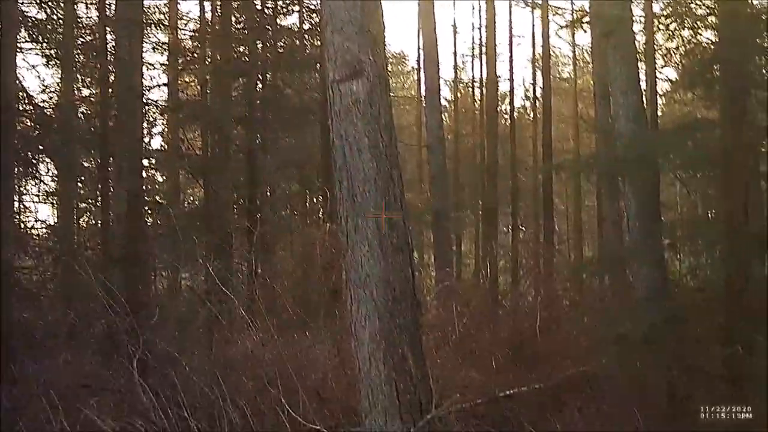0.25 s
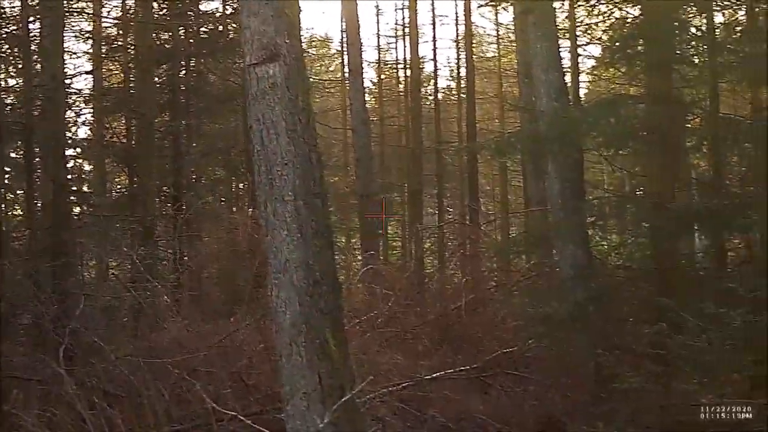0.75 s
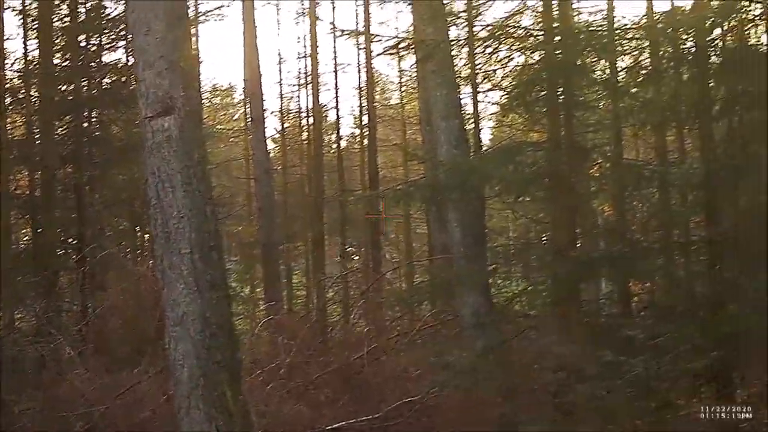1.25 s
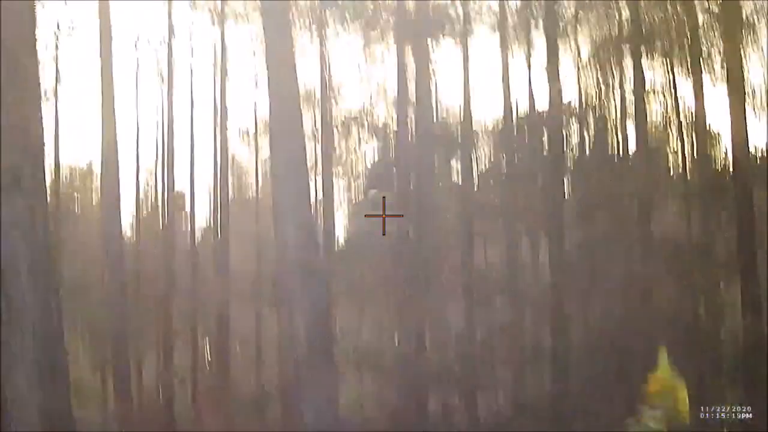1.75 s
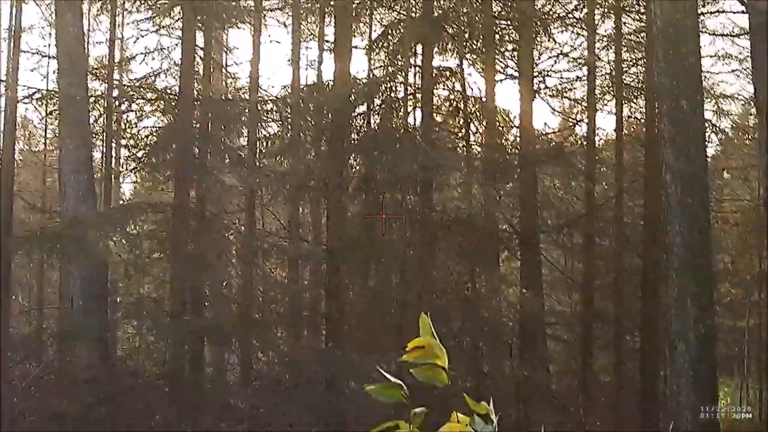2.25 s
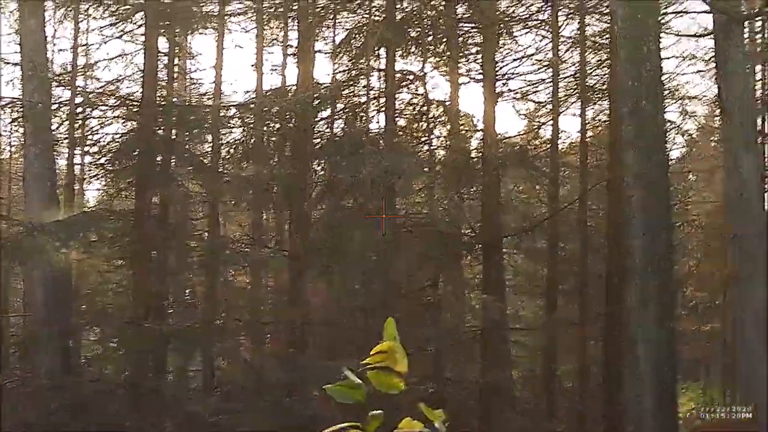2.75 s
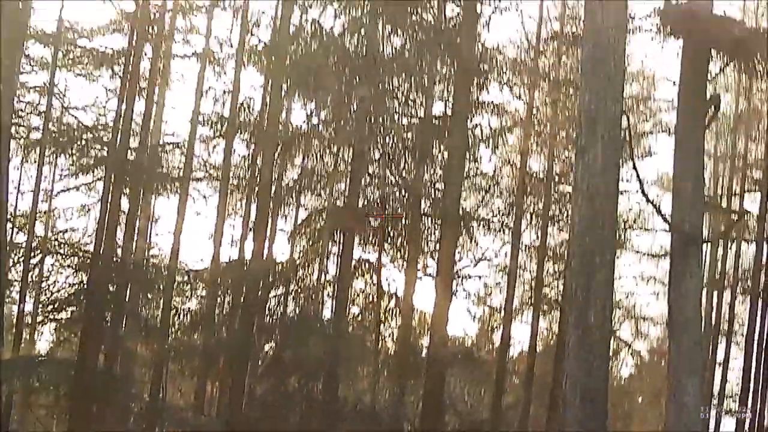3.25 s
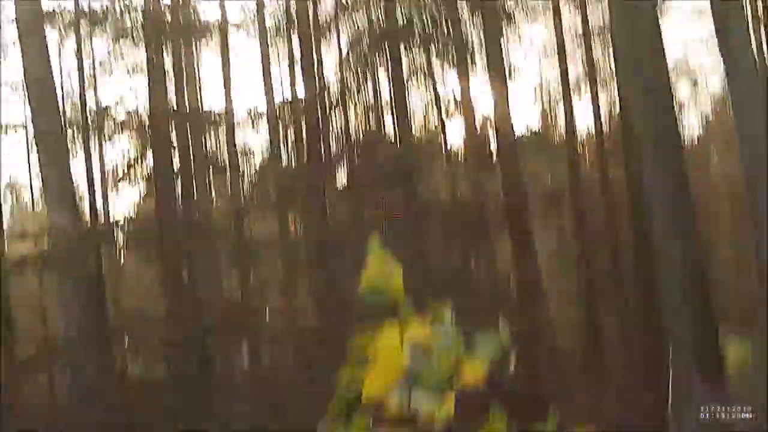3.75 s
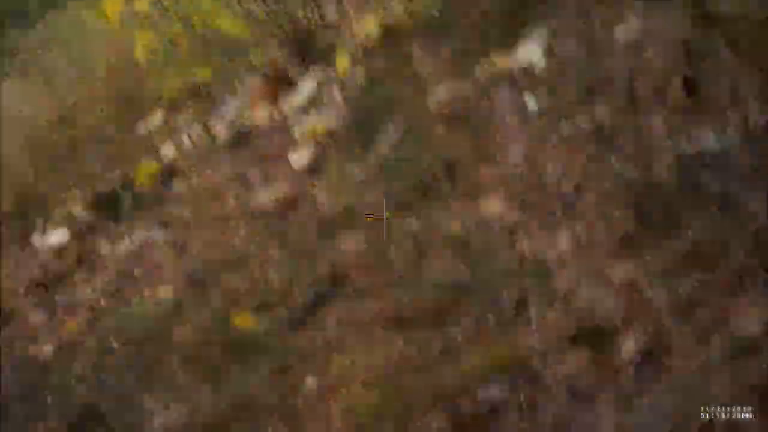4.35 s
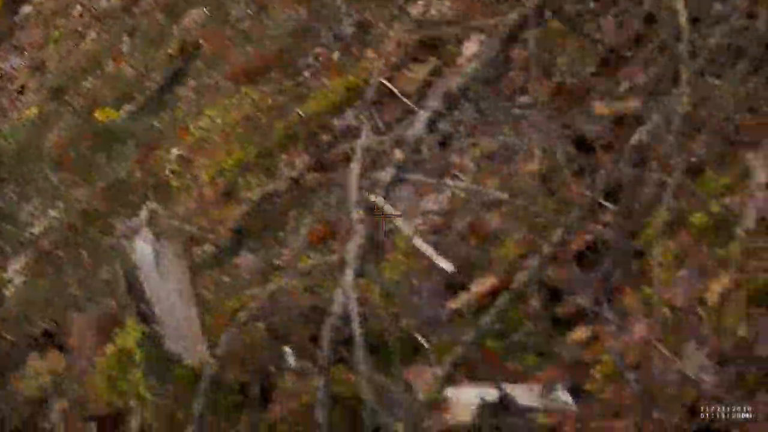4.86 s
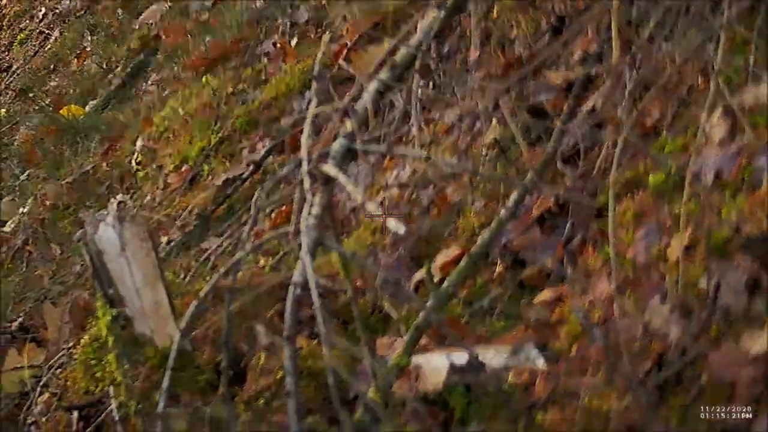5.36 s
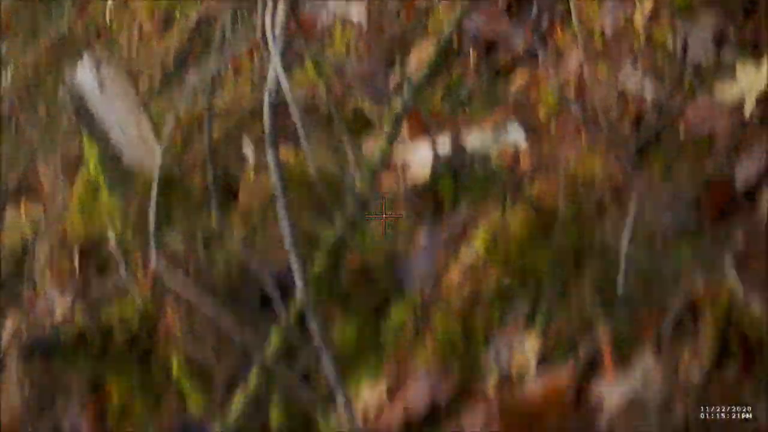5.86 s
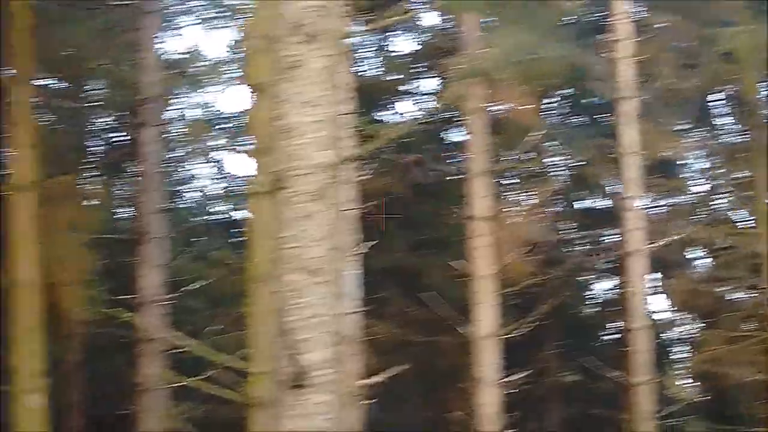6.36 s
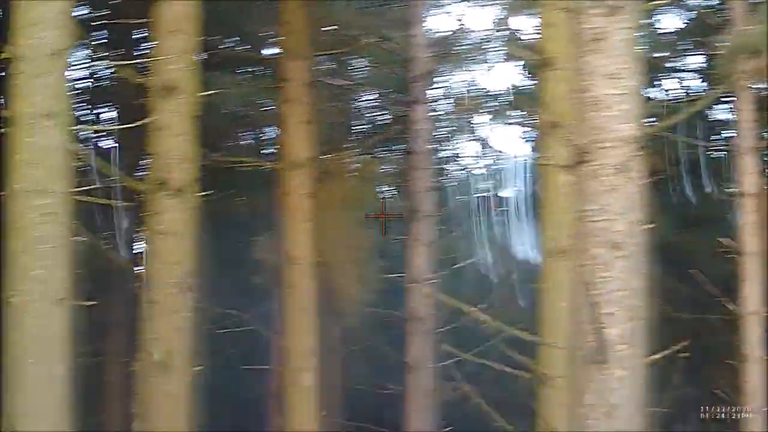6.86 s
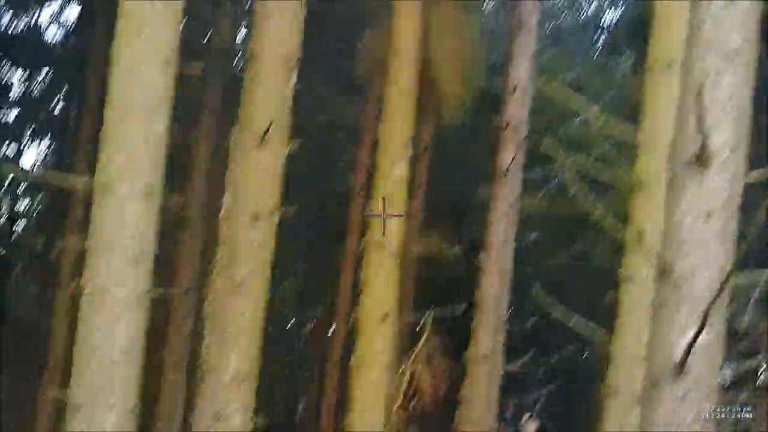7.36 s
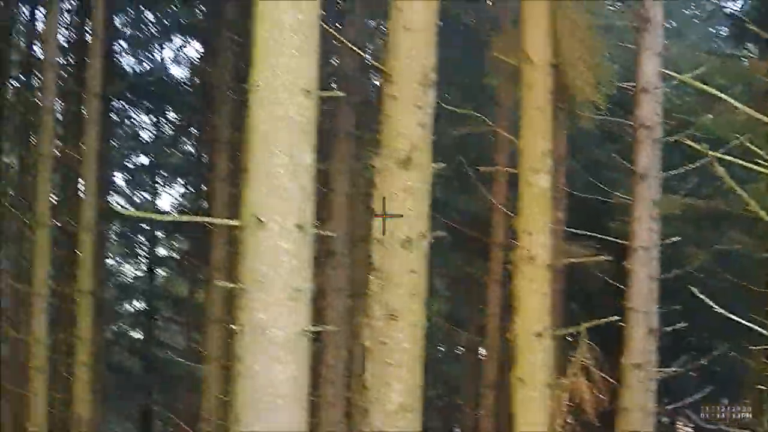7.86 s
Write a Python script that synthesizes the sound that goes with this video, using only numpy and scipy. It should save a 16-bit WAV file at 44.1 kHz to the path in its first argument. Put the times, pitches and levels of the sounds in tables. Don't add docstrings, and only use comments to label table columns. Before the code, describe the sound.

A muffled, close microphone on the gun catches a fading forest echo, then a huge clipped shotgun shot that chokes into near silence before trunk echoes burst out hollowly. Hands rumble and scrape on the stock, small dry taps lead to a loud metallic closing clack, sound cuts out for an instant, and a second, roaring shot follows with clattering fittings and reverberation.

```python
import sys
import numpy as np
from scipy import signal
from scipy.io import wavfile
from scipy.ndimage import uniform_filter1d

SR = 44100
rng = np.random.default_rng(int(sys.argv[2]) if len(sys.argv) > 2 else 0)


def master_out(mix):
    frames = np.transpose(np.atleast_2d(mix))
    ceiling = np.clip(frames, -1, 1)
    pcm = np.round(ceiling * 32767).astype(np.int16)
    wavfile.write(sys.argv[1], SR, pcm)


def to_linear_factor(level_db):
    exponent = np.asarray(level_db, float) / 20
    return 10 ** exponent


N = 357651
GAP_START_S, GAP_END_S = 6.2265, 6.4512
LIMIT = .52


def band(x, low_hz, high_hz, order=2):
    edges = [low_hz, min(high_hz, 9000)]
    return signal.sosfilt(signal.butter(order, edges, "band", fs=SR, output="sos"), x)


def rms_one(x):
    return x / np.sqrt(np.mean(x ** 2) + 1e-20)


def ring(x, hz, t60):
    r = to_linear_factor(-60 / (t60 * SR))
    w = 2 * np.pi * hz / SR
    return signal.lfilter([0, np.sin(w)], [1, -2 * r * np.cos(w), r * r], x)


def add(out, s, x):
    i = round(s * SR)
    out[i:i + len(x)] += x[:N - i]


def flicker(hz):
    slow = signal.butter(2, hz, fs=SR, output="sos")
    noise = rng.standard_normal(N + SR)
    return rms_one(signal.sosfilt(slow, noise)[SR:])


# start in seconds,
# peak level in dB, pitch in Hz, time to fall 60 dB in seconds.
SOFT_BUMPS = [(0.004, -22.5, 191, 0.076), (0.07, -30.5, 192, 0.1), (0.125, -39, 188, 0.1),
              (2.14, -20.5, 194.5, 0.16), (2.152, -25, 197, 0.064), (2.193, -36, 204, 0.054),
              (2.245, -28.5, 193, 0.11), (2.329, -25.5, 195, 0.1), (4.584, -51, 76, 0.052),
              (4.945, -43, 103, 0.058), (5.074, -48, 90, 0.061), (5.31, -28.5, 190, 0.17),
              (5.387, -29, 145.3, 0.086), (5.425, -46.5, 155, 0.15), (5.567, -19.5, 147, 0.051),
              (5.647, -39.5, 148, 0.072), (6.165, -45.5, 81, 0.12), (6.208, -32, 155, 0.035),
              (6.217, -32.5, 71.5, 0.08), (6.587, -45, 191, 0.15), (7.376, -26, 175, 0.15),
              (7.387, -37, 202, 0.081), (7.468, -20.5, 181, 0.084)]


def bumps():
    out = np.zeros(N)
    push = np.r_[np.hanning(90) / 45, np.zeros(9000)]
    for s, db, hz, t60 in SOFT_BUMPS:
        thump = ring(push, hz, t60)
        add(out, s, to_linear_factor(db + 3) * band(thump, .4 * hz, 1.6 * hz))
    return out


# pitch in Hz, width in Hz, level in dB.
HOUSING_RINGS = [
    (194.1, 19, -6),
    (618, 49, 7),
    (1024, 120, -4),
]
# time of the shot in seconds, strength in dB.
ECHO_TAILS = [
    (-.25, 1),
    (1.946, 1.5),
    (7.137, 5.5),
]
# near trunks in dB, their time to fall 60 dB in seconds,
# far trunks in dB, their time to fall 60 dB in seconds, still air in dB.
WOOD_LAYERS = [
    (-23.5, 1, -29.5, 3.01, -59.5),
    (-36, 2.59, -45.5, 4.4, -69),
    (-39.5, 0.89, -52, 0.91, -86),
    (-47.5, 0.71, -54.5, 0.95, -95),
]


def air():
    t = np.arange(N) / SR
    echoes = rng.standard_normal((3, N)) * to_linear_factor(0.61 * flicker(16))
    rings = []
    for k, (hz, width, db) in enumerate(HOUSING_RINGS):
        rings.append(to_linear_factor(db) * rms_one(ring(echoes[k % 2], hz, 2.2 / width)))
    low = rings[0] + 0.15 * rms_one(band(echoes[2], 170, 330))
    upper = rings[1] + rings[2] + .5 * rms_one(band(echoes[2], 310, 1300, order=3))
    mid = band(echoes[1], 1150, 2300, order=5)
    bright = band(echoes[2], 2300, 4100, order=5) + .3 * band(echoes[0], 4100, 6500)
    out = 0
    for colour, row in zip([low, upper, mid, bright], WOOD_LAYERS):
        near_db, near_t60, far_db, far_t60, still_db = row
        power = to_linear_factor(2 * still_db)
        for s, db in ECHO_TAILS:
            age = np.maximum(t - s, 0)
            near = to_linear_factor(2 * (near_db - 60 * age / near_t60))
            far = to_linear_factor(2 * (far_db - 60 * age / far_t60))
            end = GAP_START_S if s < GAP_START_S else np.inf
            power = power + (t > s + .07) * (t < end) * to_linear_factor(2 * db) * (near + far)
        lumps = to_linear_factor(1.2 * flicker(14))
        out = out + np.sqrt(power) * rms_one(colour * lumps)
    return out


# time in seconds, level in dB.
HAND_EFFORT = [(0.4, -64), (1.2, -101), (1.75, -67), (2.8, -67.5), (3.4, -65.5), (3.8, -53.5), (4.3, -62),
               (4.6, -51), (4.78, -69), (5.08, -48.5), (5.24, -64), (5.4, -42.5), (5.7, -50), (5.8, -63),
               (6.15, -55), (6.6, -65), (7.0, -62), (8.11, -43.5)]


def effort():
    t = np.arange(N) / SR
    sway_db, sway_t60_s = -44, 0.53
    power = to_linear_factor(2 * np.interp(t, *np.transpose(HAND_EFFORT)))
    for s, db in ECHO_TAILS:
        age = np.maximum(t - s, 0)
        power = power + (t > s) * to_linear_factor(2 * (sway_db + db - 60 * age / sway_t60_s))
    return 10 * np.log10(power)


def hands():
    rumble_db = effort()
    scuff_db = -52 + 0.4 * rumble_db
    rumble = band(rng.standard_normal(N), 30, 130) * to_linear_factor(4 * flicker(10))
    slips_per_s = 250 * to_linear_factor(6 * flicker(15))
    slips = (rng.random(N) < slips_per_s / SR) * rng.standard_normal(N)
    scuff = ring(slips, 600, 0.18) + ring(slips, 960, 0.015)
    scuff += 4 * band(slips, 450, 1800) + 0.39 * band(slips, 1400, 4200)
    return to_linear_factor(rumble_db - 3.5) * rms_one(rumble) + to_linear_factor(scuff_db) * rms_one(scuff)


# start in seconds, peak level in dB.
TRUNK_ECHOES = [
    (0.092, -32.5),
    (2.133, -22),
    (2.19, -25.5),
    (2.228, -28),
    (2.281, -29.5),
    (7.38, -48),
]
# start
# in seconds, peak level in dB, body pitch in Hz, steel level in dB.
LOOSE_RATTLES = [(0.247, -41.5, 970, -48), (0.348, -43, 680, -79), (0.368, -32, 825, -56.5),
                 (2.566, -37, 1070, -45.5), (2.638, -38, 745, -75), (2.669, -35, 605, -55),
                 (6.45, -77, 378, -56), (7.524, -30, 576, -44.5), (7.575, -29.5, 506, -41),
                 (7.613, -24.5, 600, -41), (7.639, -28, 606, -40), (7.673, -27, 933, -52.5),
                 (7.696, -30, 605, -57), (7.731, -55, 634, -57), (7.772, -51, 620, -60),
                 (8.015, -41, 590, -65.5)]
# start in seconds, peak level in dB, body pitch in Hz, steel level in dB.
GRIP_SHIFTS = [(1.029, -64, 696, -75), (2.987, -47, 604, -89), (3.342, -44, 595, -67),
               (3.402, -47.5, 650, -61), (3.433, -52, 980, -65.5), (3.816, -45, 596, -70),
               (3.86, -58.5, 910, -71), (4.076, -46, 666, -66.5), (4.098, -54, 1000, -68),
               (4.159, -44.5, 1020, -67), (4.192, -48, 730, -54), (4.205, -38.5, 636, -59),
               (4.212, -47, 990, -62), (4.263, -38, 533, -61), (4.279, -44, 673, -60),
               (4.321, -43, 620, -70), (4.464, -50.5, 603, -66), (4.521, -45, 933, -78),
               (4.529, -44, 392, -80)]
# start in seconds, peak level in dB, body pitch in Hz.
RELOAD_TAPS = [(4.723, -50.5, 880), (5.02, -42.5, 1010), (5.061, -49, 600), (5.168, -56, 964),
               (5.302, -29.5, 625), (5.444, -55, 1080), (5.643, -40.5, 470), (5.675, -55, 760),
               (5.727, -55.5, 1056), (5.923, -54.5, 1070), (6.177, -50.5, 640), (6.2, -37, 680)]
# time for the body to fall 60 dB in seconds, scrape length in seconds.
KNOCK_KINDS = [
    (0.11, 0.0034),
    (0.018, 0.0045),
    (0.045, 0.0058),
    (0.021, 0.0054),
]


def knock_rows():
    echo, rattle, grip, tap = KNOCK_KINDS
    rows = [(s, db, 587, -58.5, *echo) for s, db in TRUNK_ECHOES]
    rows += [(*row, *rattle) for row in LOOSE_RATTLES]
    rows += [(*row, *grip) for row in GRIP_SHIFTS]
    rows += [(s, db, hz, -44 + .45 * db, *tap) for s, db, hz in RELOAD_TAPS]
    return rows


# pitch in Hz, level in dB, time to fall 60 dB in seconds.
STEEL_MODES = [(1600, -5, .012), (2220, -2, .018), (3150, 0, .026), (3360, -5, .018), (4050, -2, .018),
               (5000, -4, .012), (6360, -9, .015), (7200, -10, .012)]


def knocks():
    out, t = np.zeros(N), np.arange(6000) / SR
    for s, db, hz, steel_db, t60, length in knock_rows():
        age = t / length
        scrape = rng.standard_normal(len(t)) * np.sqrt(age) * np.exp(-age)
        body = ring(scrape, hz, t60)
        rustle = band(scrape, 483, 1010, order=3)
        body = band(body / abs(body).max() + 0.51 * rustle / abs(rustle).max(), 250, 1600)
        steel = 0
        for mode_hz, mode_db, mode_t60 in STEEL_MODES:
            strength = to_linear_factor(mode_db + 5 * rng.standard_normal())
            steel = steel + strength * ring(scrape, mode_hz, mode_t60)
        snap = band(scrape, 1400, 5000, order=3)
        steel = .85 * steel / abs(steel).max() + 0.33 * snap / abs(snap).max()
        add(out, s, to_linear_factor(db + 1.5) * body + to_linear_factor(steel_db + 3.0) * steel)
    return out


# time of the blast front in seconds, seconds the lock-work knock runs ahead through
# the steel, barrel ring in Hz, seconds until that ring starts, gas roar in diaphragm limits.
GUN_SHOTS = [
    (1.9462, .0068, 146, .0034, 3.5),
    (7.1410, .0068, 142, .0031, 6.5),
]


def blasts():
    out, t = np.zeros(N), np.arange(4000) / SR
    strike = (t == 0) * 1.0
    for s, ahead, hz, delay, roar in GUN_SHOTS:
        knock = .4 * ring(strike, 105, .04) + .17 * ring(strike, 600, .08)
        growth = np.clip(t / ahead, 0, 1) ** 3
        rattle = band(rng.standard_normal(len(t)), 900, 3500) * 0.25 * growth
        add(out, s - ahead, (knock + rattle) * (t < ahead))
        add(out, s, -4 * (t < .00075))
        add(out, s + delay, 26 * np.sin(2 * np.pi * hz * t) * np.exp(-t / .0077))
        gas = band(rng.standard_normal(len(t)), 700, 4500)
        add(out, s, gas * 1.6 * roar * np.exp(-t / .009))
    return out


# seconds after the blast front, deflection in limits.
GAS_PUSH = [
    (.0008, 0),
    (.001, 7),
    (.006, 3),
    (.0165, 3),
    (.0195, 6),
]
# seconds the slam takes to free the diaphragm, dip in limits,
# rebound in limits, time it leaves the lower limit in seconds, settling time in seconds.
SHOT_RECOILS = [
    (.0045, -.45, 1.5, 2.122, .034),
    (.0015, -.05, .3, 7.361, .088),
]


def swing():
    t = np.arange(N) / SR
    out = -.25 * np.exp(-t / .07)
    resumed = (t > GAP_END_S) * (t < GUN_SHOTS[-1][0])
    out += resumed * (.028 + .075 * (t - GAP_END_S))
    deepest, free_at = -3, -1.06
    for shot, slam_row, recoil in zip(GUN_SHOTS, ACTION_SLAMS, SHOT_RECOILS):
        front, slam, length = shot[0], slam_row[0], slam_row[1]
        fall, dip, rebound, free, settle = recoil
        back, end = slam + .46 * length, slam + length + .001
        path = [(front + s, d) for s, d in GAS_PUSH]
        path += [(slam - .0005, 1.4), (slam + fall, dip), (back, dip)]
        path += [(back + .0005, rebound), (slam + .79 * length, rebound)]
        path += [(end, deepest / 2), (end + .026, deepest), (free, free_at)]
        settling = (1 + np.maximum(t - free, 0) / settle) ** -1.2
        out += np.interp(t, *np.transpose(path)) * settling
    return out


# start in seconds, length in seconds, level in dB, ring in Hz.
ACTION_SLAMS = [
    (1.9905, .0145, -10.5, 950),
    (7.1995, .012, -12.5, 1370),
]


def slams():
    out, t = np.zeros(N), np.arange(3000) / SR
    for s, length, db, hz in ACTION_SLAMS:
        clatter = rng.standard_normal(len(t)) * np.exp(-(t / length) ** 4)
        tone = ring(clatter, hz, 0.038)
        sound = .8 * tone / abs(tone).max()
        sound += 2.3 * band(clatter, 250, 1500) + .45 * band(clatter, 1500, 3500)
        add(out, s, to_linear_factor(db) * band(sound, 100, 3000))
    return out


# start in seconds, level in dB, length in seconds, extra steel in dB.
CLOSING_CLACKS = [
    (5.534, -46.5, 0.0026, -0.5),
    (5.5575, -8, .004, -5),
    (5.585, -22, .0025, 3.5),
    (5.602, -32.5, 0.0036, 2.5),
]
# pitch in Hz, level in dB, time to fall 60 dB in seconds.
BREECH_MODES = [(684, -3, .022), (980, -1, .028), (1100, 0, .03), (1320, -5, .03), (1890, -13, .05),
                (2240, -9, .03), (3144, -15, .06), (3360, -13, .065), (4040, -15, .055), (4970, -16, .015),
                (6363, -20, .06)]


def clacks():
    out, t = np.zeros(N), np.arange(6000) / SR
    for s, db, length, boost_db in CLOSING_CLACKS:
        blow = rng.standard_normal(len(t)) * np.exp(-t / length) * np.clip(t / 0.0013, 0, 1)
        drive = .4 * blow + 12 * (t == 0)
        modes = 0
        for hz, mode_db, t60 in BREECH_MODES:
            modes = modes + to_linear_factor(mode_db + boost_db * (hz > 3000)) * ring(drive, hz, t60)
        modes *= np.clip(t / 0.0018, 0, 1)
        loose = blow + .3 * rng.standard_normal(len(t)) * np.exp(-t / .014)
        crack = 0.92 * band(loose, 550, 2500)
        crack += 0.047 * to_linear_factor(boost_db) * band(blow + .5 * loose, 2500, 6000)
        add(out, s, to_linear_factor(db) * (.9 * modes / abs(modes).max() + crack))
    return out


def scene():
    sounds = bumps() + air() + hands() + knocks() + slams() + clacks()
    muffled = signal.sosfilt(signal.butter(6, 7000, fs=SR, output="sos"), sounds)
    return (LIMIT * (swing() + blasts()) + muffled)[None]


def band_limit(x):
    return signal.sosfilt(signal.butter(12, 8380, fs=SR, output="sos"), x)


def record(dry):
    pinned = np.clip(dry, -LIMIT, LIMIT)
    sag_s, start, top = .112, .105, .5
    r = np.exp(-1 / (sag_s * SR))
    sagging = signal.lfilter([1, -1], [1, -r], pinned, zi=start - pinned[:, :1])[0]
    x = np.clip(sagging, -top, top)
    dropouts = uniform_filter1d((flicker(14) < -1.8) * .97, size=200)
    x = x + to_linear_factor(-76.5 + 6.5) * rng.standard_normal(N) * (1 - dropouts)
    x = signal.sosfiltfilt(signal.cheby2(8, 24, 8150, fs=SR, output="sos"), x)
    t = np.arange(N) / SR
    x = x * ((t < GAP_START_S) | (t > GAP_END_S))
    return band_limit(x)


dry = scene()
out = record(dry)
master_out(out)
```